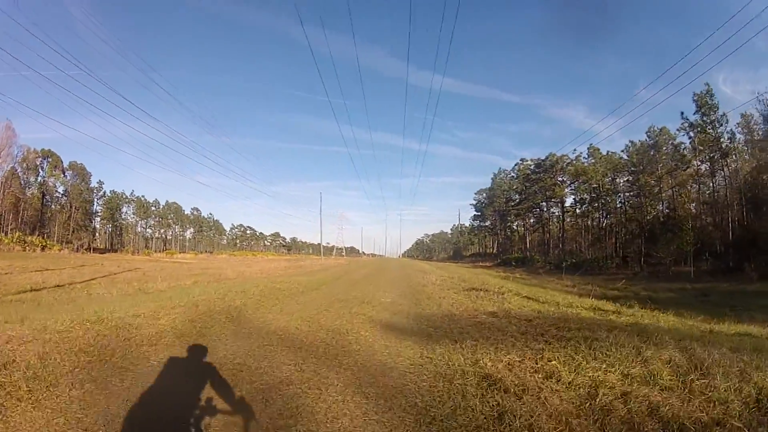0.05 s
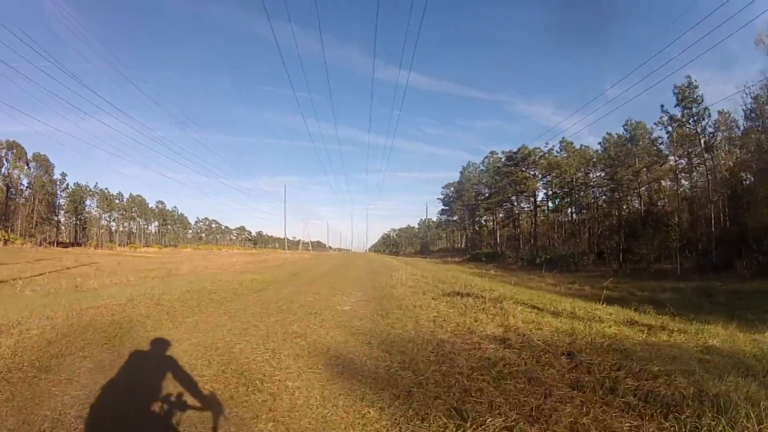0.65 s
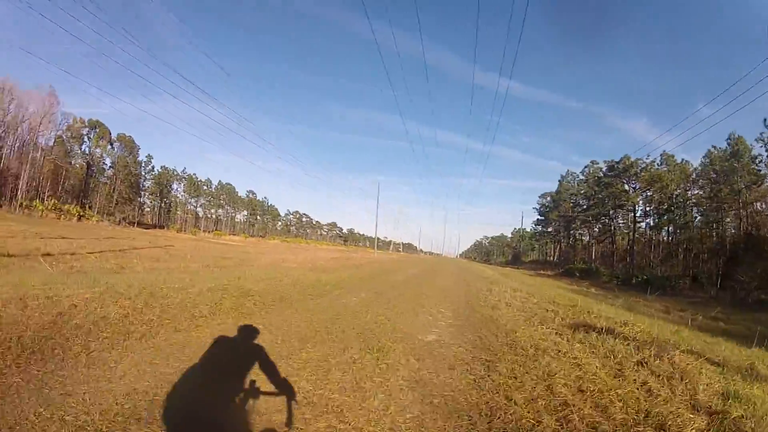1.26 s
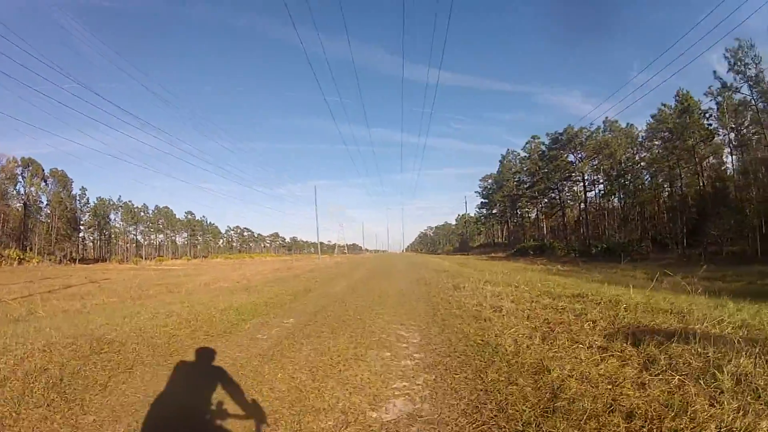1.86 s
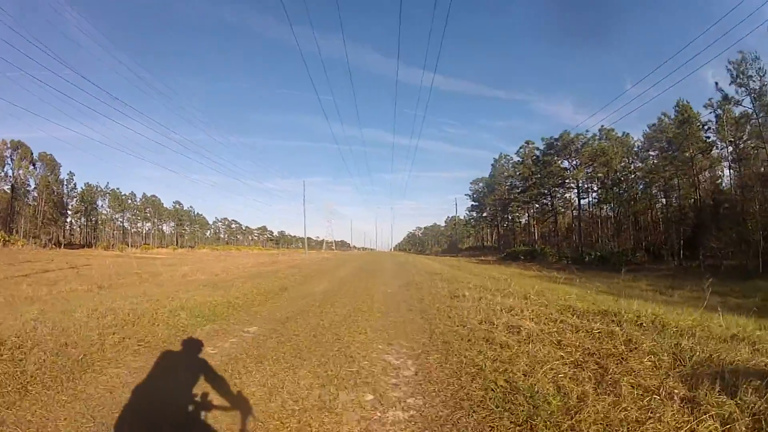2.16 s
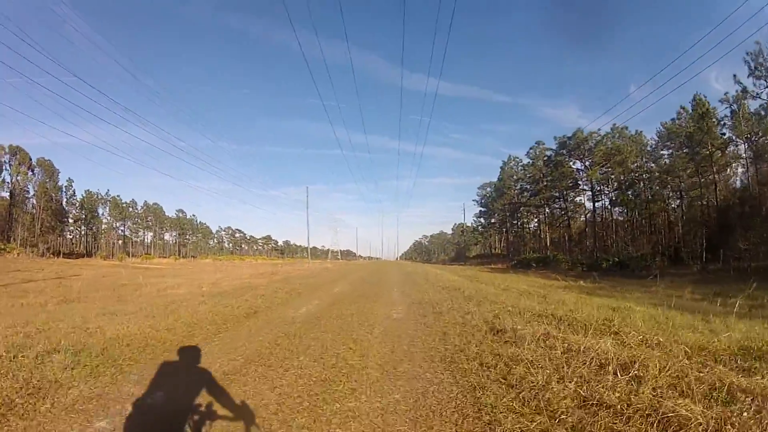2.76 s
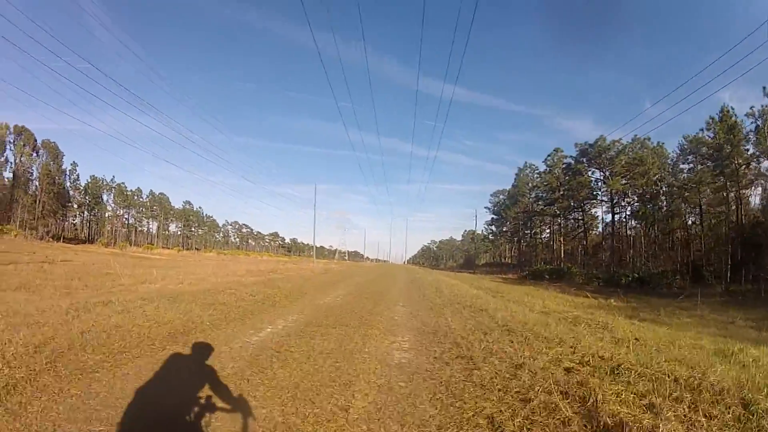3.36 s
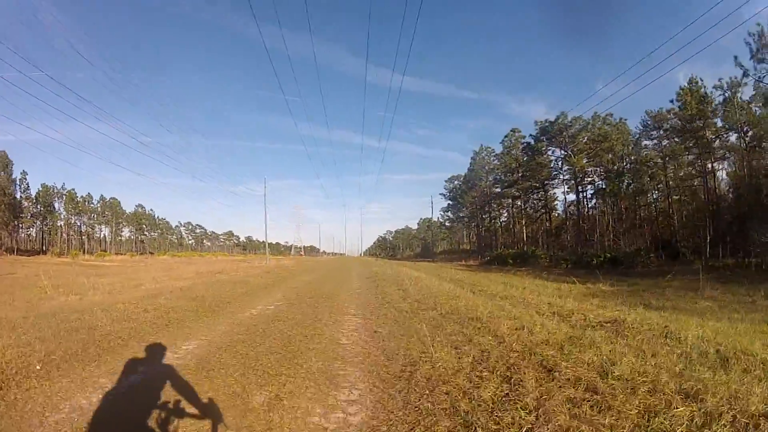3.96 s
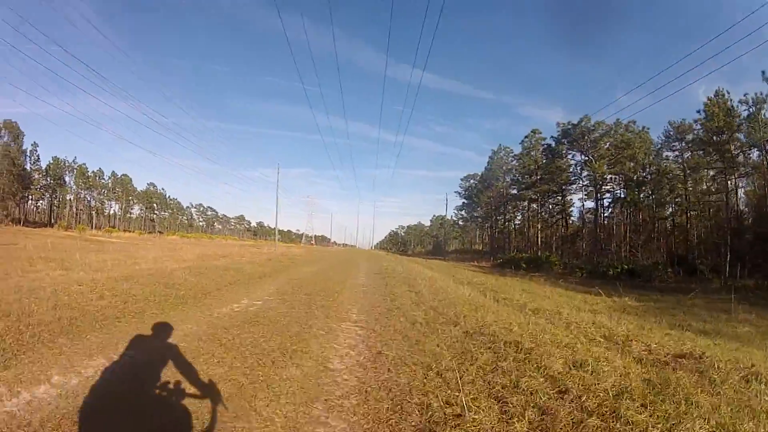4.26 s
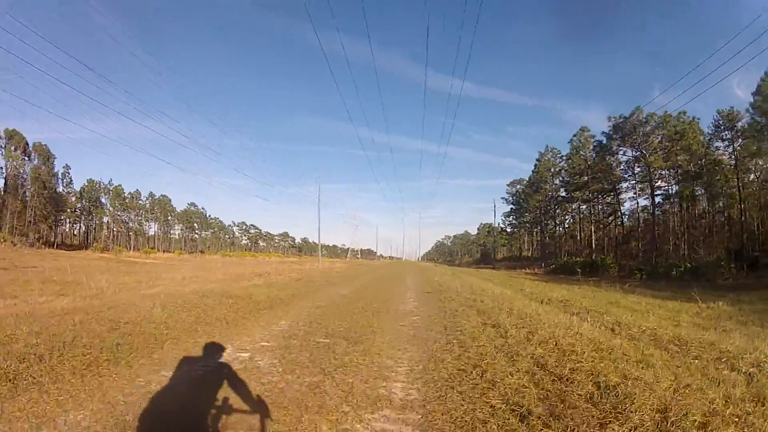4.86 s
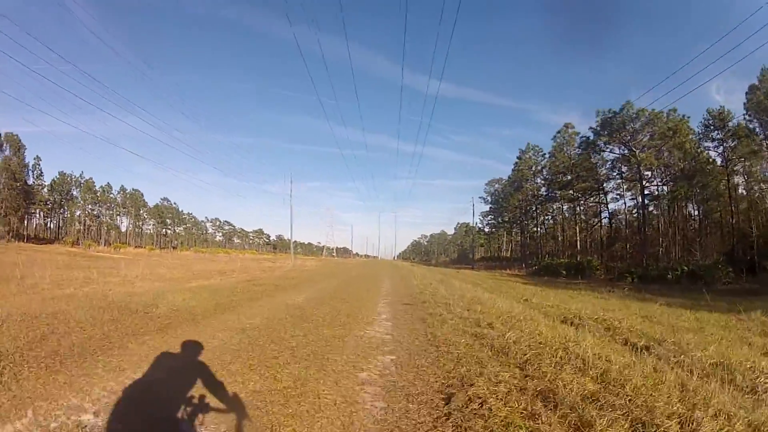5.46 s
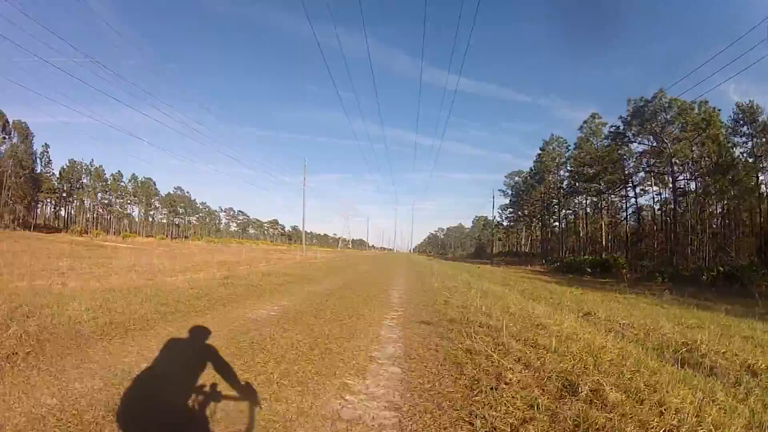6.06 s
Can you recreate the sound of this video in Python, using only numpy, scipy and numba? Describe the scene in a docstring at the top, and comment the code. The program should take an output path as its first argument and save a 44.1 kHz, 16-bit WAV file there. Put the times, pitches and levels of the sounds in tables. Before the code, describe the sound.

Wind rumbles on a plastic-cased microphone carried by a cyclist crossing rough, grassy ground. The tyres hum in short swells, the bicycle booms dully and the case shudders, over soft rustling and a faint, high pulsing whine. Loud, close plastic clacks come singly and in bunches, hardest as the wheels thump through a hole about two seconds in. Later the mount rattles rapidly for half a second, and a twig cracks under the wheels.

```python
"""A bicycle rolls over a bumpy grass and dirt track, heard from a camera in a plastic case on the rider.
From the start wind buffets, tyre knobs hum, grass rustles, the chain ticks and the ground shakes the case;
a faint electronic whine pulses. From 0.9 s the loose mount clacks on bumps, hardest at a hole at 2.2 s.
Loud clacks overload the microphone, and the gain control briefly turns the ride down. The frame booms
more as grass thins to dirt. From 5.4 s the mount rattles for half a second; near the end a twig snaps."""
import sys
import numpy as np
from scipy import signal
from scipy.fft import rfft, irfft
from scipy.io import wavfile
from numba import njit

SR = 44100
rng = np.random.default_rng(int(sys.argv[2]) if len(sys.argv) > 2 else 0)


def waveform_to_disk(signal):
    """Save audio, clipped to [-1, 1], as 16-bit WAV at the path in sys.argv[1]."""
    frames = np.transpose(np.atleast_2d(signal))
    scaled = np.clip(frames, -1, 1) * 32767
    samples = np.round(scaled).astype(np.int16)
    wavfile.write(sys.argv[1], SR, samples)


N = 274302
TIME = np.arange(N) / SR
FREQ = np.maximum(np.arange(N // 2 + 1) * SR / N, 1)

# tone of the wind on the case: (frequency [Hz], level [dB])
WIND_SPECTRUM = [(15, -26), (30, -13), (50, 5), (80, 1), (110, -15.5), (250, -22), (500, -23.5), (900, -50)]
# bands of a thin, high electronic whine: (frequency [Hz], rough width [Hz], level [dB])
ELECTRONIC_BANDS = [(2430, 140, 1), (3970, 100, 5), (8050, 120, -1), (9600, 200, -12), (11320, 100, 3.5),
                    (12680, 100, 3), (14450, 200, -13)]
# tone of the grass and the chain: (frequency [Hz], level [dB])
RUSTLE_SPECTRUM = [(300, -2), (900, 1.5), (1500, 5), (2400, 5.5), (2900, -2), (4200, -4), (5000, -24),
                   (6200, -52), (7500, -13.5), (9500, -8.5), (11000, -5), (12000, -18), (13200, -3.5),
                   (15500, -24)]
# twigs and grit snapping: (time [s], level [dB])
TWIG_SNAPS = [(2.138, -47), (2.641, -27), (3.398, -23), (4.092, -35), (4.508, -30), (5.102, -17.5),
              (5.25, -24), (6.1167, -7)]
# tone of those snaps: (frequency [Hz], level [dB])
SNAP_SPECTRUM = [(300, -10), (900, -0.5), (2500, -1.5), (4500, -5.5), (6500, -10), (10000, -11),
                 (15000, -25)]
# rough ground, which shakes the bicycle harder: (start [s], length [s], rise [dB])
ROUGH_GROUND = [(.03, 0.073, 2.5), (.33, 0.29, 1.5), (.52, .11, 2), (1.12, 0.57, 1.5), (1.62, 0.25, 0.5),
                (1.85, 0.4, 1.5), (2.55, 0.42, 3.5), (3.21, 0.32, 4.5), (3.85, 0.19, 2), (4.48, 0.52, 2.5),
                (5.14, 0.29, 4), (6.0, 0.2, 5)]
# tone of the booming frame: (frequency [Hz], level [dB])
BOOM_SPECTRUM = [(60, -10), (105, -12), (135, 4.5), (162, 3), (215, -15), (320, -15), (480, -22),
                 (900, -51)]
# deep holes that make the whole bicycle thump: (time [s], level [dB])
DEEP_HOLES = [(2.224, -8.5), (2.685, -18), (4.173, -16)]
# dull jolts from ruts: (time [s], level [dB])
RUT_JOLTS = [(.962, -9), (2.133, -11.5), (2.223, 2.5), (3.221, -7), (3.438, -10), (5.427, 0)]
# where the air and walls of the shaken case ring: (frequency [Hz], width [Hz], level [dB])
HOLLOW_RINGS = [(643, 58.3, 2.5), (738, 105, -2), (863, 84.7, -8), (983, 54, -11.5), (1153, 55.5, -13),
                (1516, 31, -22.5)]
# how often tyre knobs meet the ground: (time [s], rate [Hz])
KNOB_RATES = [(0, 70), (.3, 72), (.85, 72), (1.3, 66), (1.8, 71), (2.15, 72), (2.55, 64), (3.3, 68),
              (4.15, 70), (4.7, 64), (5.25, 66), (6.22, 70)]
# firm ground, where the tyres hum louder: (start [s], length [s], rise [dB])
FIRM_GROUND = [(.09, 0.13, 12), (.31, 0.55, 12), (.52, 0.17, 3), (.96, 0.16, 4), (1.37, 0.085, 7.5),
               (1.81, 0.32, 14.5), (2.65, 0.075, 14), (3.37, 0.077, 9.5), (3.82, 0.34, 5.5),
               (4.08, 0.14, 10), (5.14, 0.22, 11.5)]
# the loose mount slides between clacks: (start [s], length [s], level [dB])
MOUNT_SLIDES = [(2.954, 0.028, -27.5), (2.983, 0.064, -42.5)]
# tone of that sliding: (frequency [Hz], level [dB])
SLIDE_SPECTRUM = [(600, -20), (1500, 0), (2400, 2), (3500, -6), (4800, -2), (6000, -14), (7500, -5),
                  (15000, -24)]
# notes of the struck case: (frequency [Hz], time to fade 60 dB before case_ring caps it [s], level [dB])
CASE_NOTES = [(610, 0.027, -27), (825, 0.0072, -3.5), (1002, 0.054, -13.5), (1219.5, 0.017, -2.5),
              (1533, 0.017, -5.5), (1800, 0.021, -8.5), (2406, 0.017, -4), (2747, 0.011, 0),
              (3316, 0.017, -4.5), (3980, 0.017, -16.5), (5200, 0.0095, -16), (6030, 0.0048, -23.5),
              (8940, 0.02, -4.5), (9353, 0.018, -6), (10400, 0.015, -13.5), (14700, 0.0041, -12)]
# the mount hits its stop: (time [s], level [dB])
MOUNT_CLACKS = [(0.8868, 7), (0.8933, -7.5), (1.5463, -4.5), (1.5687, 2), (2.218, -15.0), (2.227, 15),
                (2.259, 17), (2.2884, 9.5), (2.701, 8.5), (2.7638, 12.5), (2.7895, 5.5), (2.8661, -6),
                (2.8919, 9.5), (2.9208, 12.5), (2.9277, 1.5), (2.9504, 8), (2.9809, 8.5), (3.0606, 11),
                (3.0915, 1.5), (3.1103, 0), (3.7116, 12), (3.7338, 7), (4.1831, 11.5), (4.9396, 10),
                (5.0159, 13), (5.389, 8), (5.4126, 3.5), (5.419, 0.5), (5.4296, 0), (5.4482, 11.5),
                (5.486, 9), (5.507, 0), (5.5272, 5), (5.5464, 9.5), (5.578, 4.5), (5.5906, -3.5),
                (5.6119, 4.5), (5.6514, 7), (5.6796, -0.5), (5.7047, 5.5), (5.729, 0.5), (5.756, 7),
                (5.8056, -0.5), (5.8274, 8.5), (5.8473, 3), (5.8698, 6), (5.9266, 7.5), (5.9436, -6)]


def undb(db):
    """Turn decibels into a number to multiply by."""
    return 10 ** (np.asarray(db) / 20)


def rms(x):
    """Average strength of a signal (root mean square)."""
    return np.sqrt(np.mean(x ** 2))


def unit(x):
    """Scale to an average strength of 1."""
    return x / rms(x)


def drift(rate):
    """A smooth random wobble of strength 1, changing about rate times a second."""
    return unit(irfft(rfft(rng.standard_normal(N)) / (1 + (FREQ / rate) ** 4), N))


def colour(x, spectrum):
    """Shape the tone of x with (frequency [Hz], level [dB]) points."""
    hz, db = np.transpose(spectrum)
    return unit(irfft(rfft(x) * undb(np.interp(np.log(FREQ), np.log(hz), db)), N))


def resonate(x, peaks):
    """Make x ring at each (frequency [Hz], width [Hz], level [dB]); neighbours swing opposite ways."""
    response = sum((-1) ** k * undb(db) / (1 + 1j * hz / width * (FREQ / hz - hz / FREQ))
                   for k, (hz, width, db) in enumerate(peaks))
    return unit(irfft(rfft(x) * response, N))


def grains(rate, spread_db):
    """Random tiny hits, rate a second, a few much larger than the rest."""
    size = undb(spread_db * np.minimum(rng.exponential(size=N), 4))
    return unit((rng.random(N) < rate / SR) * size * rng.standard_normal(N))


def bursts(table, decay_s):
    """A burst of noise dying away from each (time [s], level [dB]) row."""
    size = sum(undb(db) * (TIME >= s) * np.exp(-np.abs(TIME - s) / decay_s) for s, db in table)
    return size * rng.standard_normal(N) / 2


def stretches(table, edge_s):
    """A curve that ramps up, holds and ramps down for each (start [s], length [s], height) row."""
    return sum(height * np.clip(.5 + np.minimum(TIME - s, s + length - TIME) / edge_s, 0, 1)
               for s, length, height in table)


def pulse_train(rate_hz=30, wander=0.04, scatter_db=5.5):
    """A strength that jumps and fades about rate_hz times a second, some pulses bigger than others."""
    phase = np.cumsum(rate_hz * (1 + wander * drift(5.5))) / SR % 1
    return unit(np.exp(-phase / 0.22) * undb(scatter_db * drift(18.7)))


def electronic_whine(level_db, pulses):
    """A thin, high electronic whine, pulsing about 30 times a second."""
    push = (0.6 + pulses) * rng.standard_normal(N)
    hiss = np.zeros(N)
    for hz, width, db in ELECTRONIC_BANDS:
        band = [(hz, width * 2, 0)]
        hiss += undb(db) * np.sqrt(width) * resonate(resonate(push, band), band)
    return unit(hiss) * undb(level_db)


def wind(level_db=-34, gust_db=2):
    """Swirls of air buffet the case."""
    return colour(rng.standard_normal(N), WIND_SPECTRUM) * undb(level_db + gust_db * drift(40))


def chain(pulses, level_db=-47):
    """The chain rasps softly as each link drops onto a tooth."""
    return colour(pulses * rng.standard_normal(N), RUSTLE_SPECTRUM) * undb(level_db)


def grass(level_db, crackle_db=-6, flutter_db=2.5):
    """Dry blades brush and crackle finely under the tyres."""
    brush = rng.standard_normal(N) + undb(crackle_db) * grains(rate=1300, spread_db=8.5)
    return colour(brush, RUSTLE_SPECTRUM) * undb(level_db + flutter_db * drift(120))


def twigs():
    """Twigs and grit snap under the wheels."""
    cracks = bursts(TWIG_SNAPS, decay_s=0.0035)
    return colour(cracks, SNAP_SPECTRUM) * rms(cracks)


def frame_boom(level_db, flutter_db=1.2):
    """Uneven ground makes the frame and mount boom."""
    return colour(rng.standard_normal(N), BOOM_SPECTRUM) * undb(level_db + flutter_db * drift(40))


def frame_thumps(hz=85, decay_s=0.015):
    """The frame swings once or twice after a deep hole."""
    ages = [(np.maximum(TIME - s, 0), db) for s, db in DEEP_HOLES]
    return sum(undb(db) * np.sin(2 * np.pi * hz * age) * np.exp(-age / decay_s) for age, db in ages)


def case_shake(level_db, flutter_db=2, low_cut_hz=560):
    """Countless small knocks and a few deep ruts ring the hollow case, which lets little bass through."""
    knocks = grains(rate=3000, spread_db=2.55) * undb(level_db + flutter_db * drift(35))
    push = knocks + bursts(RUT_JOLTS, decay_s=0.0086)
    low_cut = signal.butter(4, low_cut_hz, "high", fs=SR, output="sos")
    ring = signal.sosfilt(low_cut, resonate(push, HOLLOW_RINGS))
    return unit(ring) * rms(push)


def tyre_hum(soft_grass_db=-36.3, wander=0.027, octave_db=-21):
    """Tyre knobs drum and hum through the frame: uneven on soft grass, loud and steady on firm ground."""
    knob_hz = np.interp(TIME, *np.transpose(KNOB_RATES))
    phase = 2 * np.pi * np.cumsum(knob_hz * (1 + wander * drift(23))) / SR
    wave = np.sin(phase) + undb(octave_db + 2 * drift(36)) * np.sin(2 * phase)
    firm_db = stretches(FIRM_GROUND, edge_s=0.033)
    flutter_db = 4 * np.exp(-firm_db / 9)
    return unit(wave) * undb(soft_grass_db + firm_db + flutter_db * drift(3.2))


def mount_slides():
    """The mount slides on its seat with a fine, gritty hiss."""
    size = stretches([(s, length, undb(db)) for s, length, db in MOUNT_SLIDES], edge_s=0.006)
    return colour(grains(rate=9000, spread_db=3), SLIDE_SPECTRUM) * size


def case_ring(t, max_swings=48):
    """The case rings after one tap; plastic soaks up motion, so notes last a few dozen swings at most."""
    hz, fade_s, db = np.transpose(CASE_NOTES)
    fade_s = np.minimum(fade_s, max_swings / hz)
    direction = (-1) ** np.arange(len(hz))
    notes = np.sin(2 * np.pi * np.outer(hz, t)) * np.exp(-np.log(1000) * np.outer(1 / fade_s, t))
    ring = (direction * undb(db)) @ notes
    return ring / np.abs(ring).max()


def mount_clacks(bounce_s=0.00108, chatter_s=0.0012, grit_s=0.0017, thud_hz=170, thud_s=0.0028):
    """The mount hits its stop, bounces at once and chatters a little; each blow rings the case."""
    t = TIME[:SR // 10]
    ring = case_ring(t)
    knock = (t == 0) + 0.31 * (t == t[int(bounce_s * SR)])
    thud = np.sin(2 * np.pi * thud_hz * t) * np.exp(-t / thud_s)
    bright = signal.butter(2, 8000, "high", fs=SR, output="sos")
    out = np.zeros(N + len(t))
    for s, db in MOUNT_CLACKS:
        rub, grit = rng.standard_normal((2, len(t)))
        chatter = 0.06 * rub * t / chatter_s * np.exp(1 - t / chatter_s)
        blow = signal.fftconvolve(knock + chatter, ring)[:len(t)]
        # plastic grinds on plastic: a dry, bright crack
        crack = undb(-20) * signal.sosfilt(bright, grit) * t / grit_s * np.exp(1 - t / grit_s)
        # a low thud sounds under each blow, stronger for harder blows
        body = undb(-20 + min(db, 10)) * thud
        start = int(s * SR)
        out[start:start + len(t)] += undb(db - 3) * (blow + crack + body)
    return out[:N]


def scene():
    """Everything reaches one microphone through the case; rough ground shakes, booms and rustles more."""
    rough_db = stretches(ROUGH_GROUND, edge_s=0.082)
    boom_db = -42 + 1.05 * TIME + 1.63 * rough_db  # grows as the grass thins to dirt
    hiss_db = -44.5 + 0.77 * (rough_db - rough_db.mean())
    pulses = pulse_train()
    rolling = tyre_hum() + frame_boom(boom_db) + frame_thumps() + case_shake(-31 + rough_db)
    background = grass(hiss_db) + twigs() + chain(pulses) + electronic_whine(hiss_db - 3.5, pulses)
    return (rolling + background + wind() + mount_clacks() + mount_slides())[None]


@njit
def gain_control(x, ceiling, down_db_per_s, hold_s, up_db_per_s, memory_s):
    """Turn the sound down while its peak is over the ceiling, wait a moment, then turn it back up."""
    y = np.empty(len(x))
    cut_db, wait_s, peak = 0., 0., 0.
    for i in range(len(x)):
        y[i] = x[i] * 10 ** (-cut_db / 20)
        peak = max(abs(y[i]), peak * (1 - 1 / (memory_s * SR)))
        wait_s -= 1 / SR
        if peak > ceiling:
            cut_db += down_db_per_s / SR
            wait_s = hold_s
        elif wait_s < 0:
            cut_db = max(cut_db - up_db_per_s / SR, 0.)
    return y


def record(dry, top_hz=15700):
    """The gain control is too slow for clacks, so their first swings are squashed; the top is then cut."""
    ducked = gain_control(dry[0], ceiling=0.85, down_db_per_s=1730., hold_s=0.0392,
                          up_db_per_s=167., memory_s=0.0039)
    squashed = ducked / (1 + ducked ** 4) ** (1 / 4)
    high_cut = signal.ellip(8, .2, 70, top_hz, fs=SR, output="sos")
    return signal.sosfilt(high_cut, squashed)[None]


dry = scene()
out = record(dry)
waveform_to_disk(out)
```